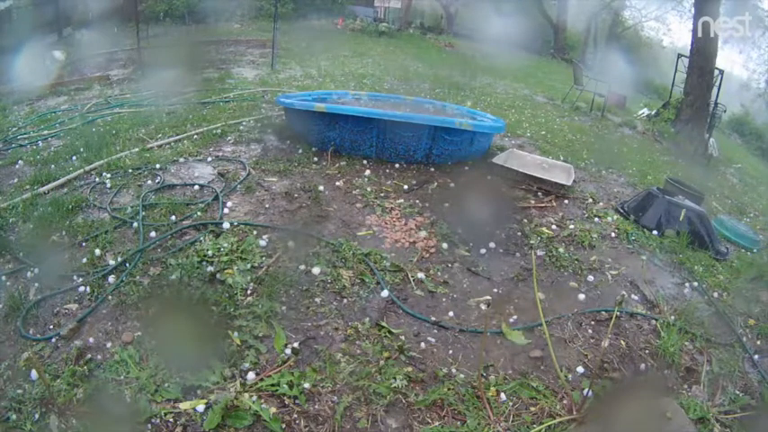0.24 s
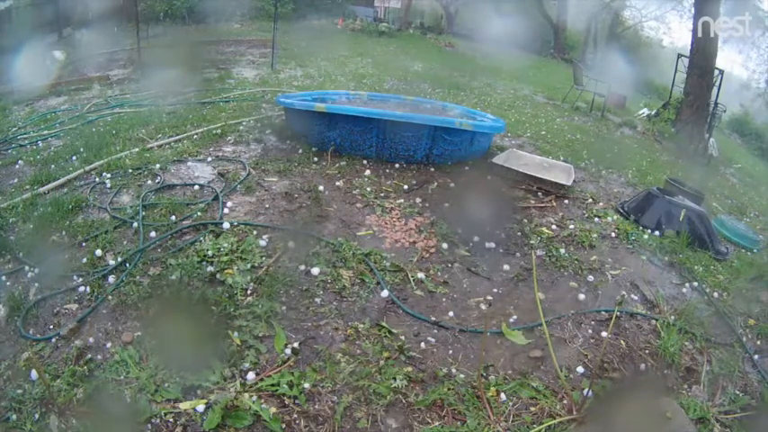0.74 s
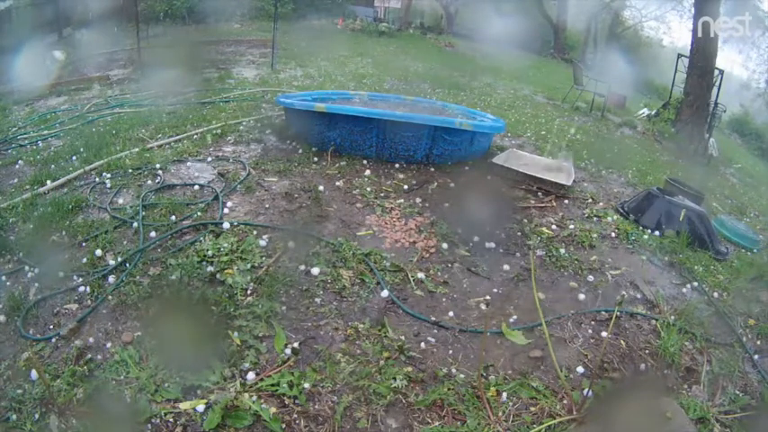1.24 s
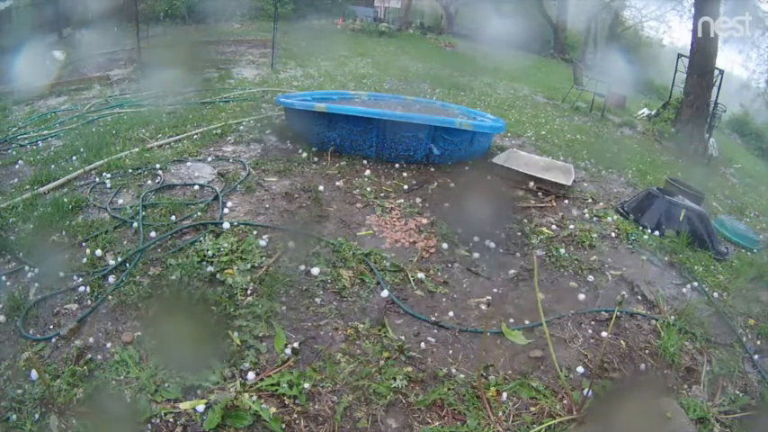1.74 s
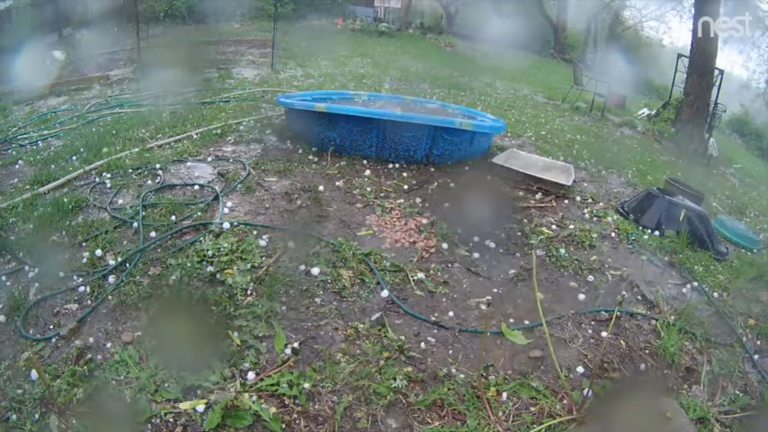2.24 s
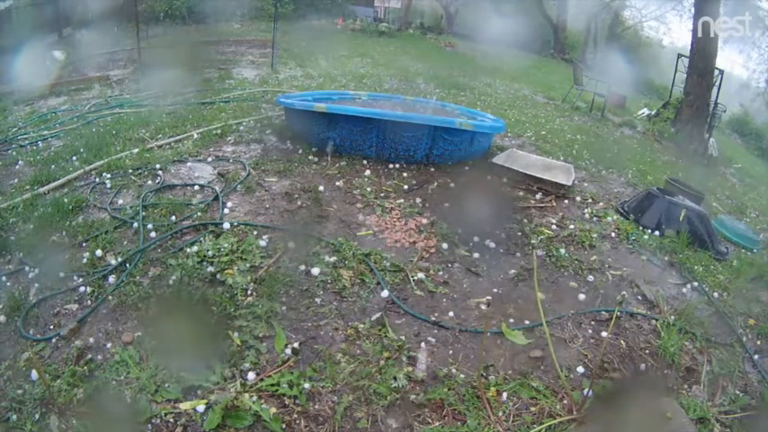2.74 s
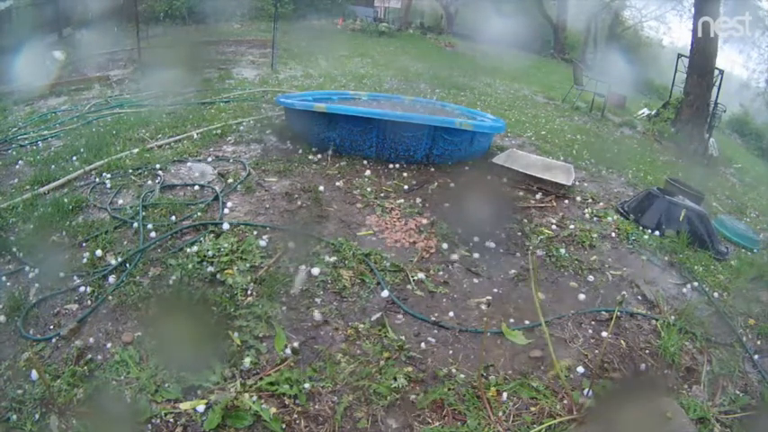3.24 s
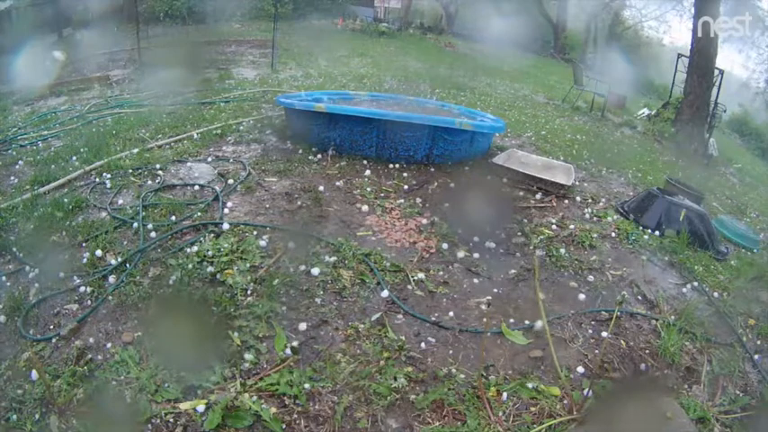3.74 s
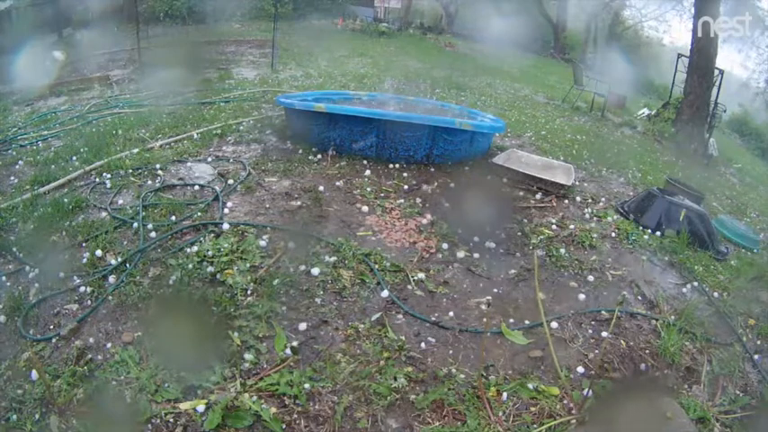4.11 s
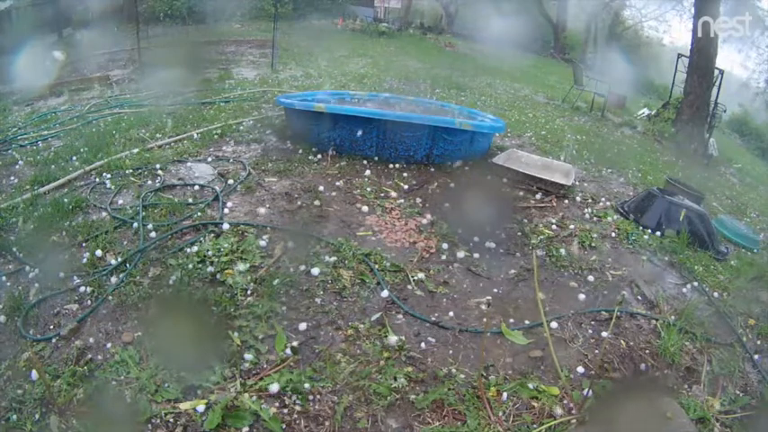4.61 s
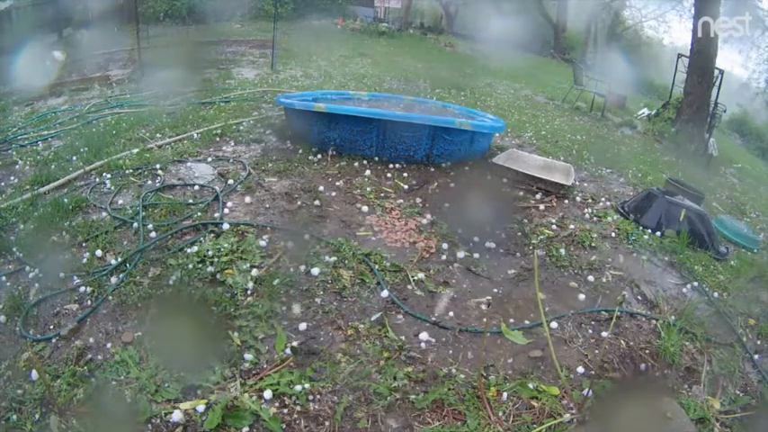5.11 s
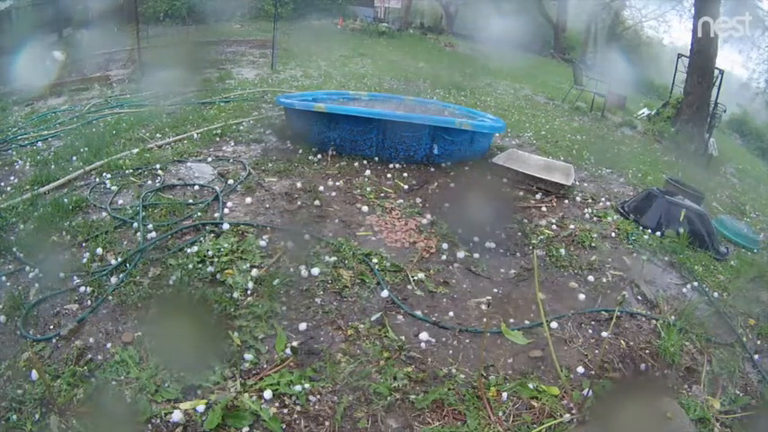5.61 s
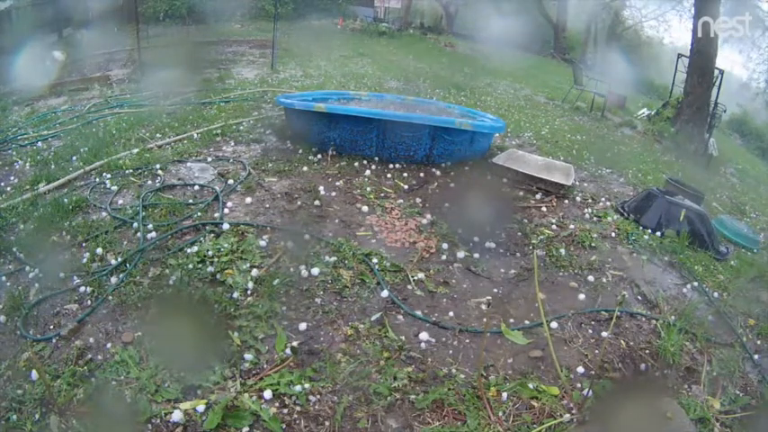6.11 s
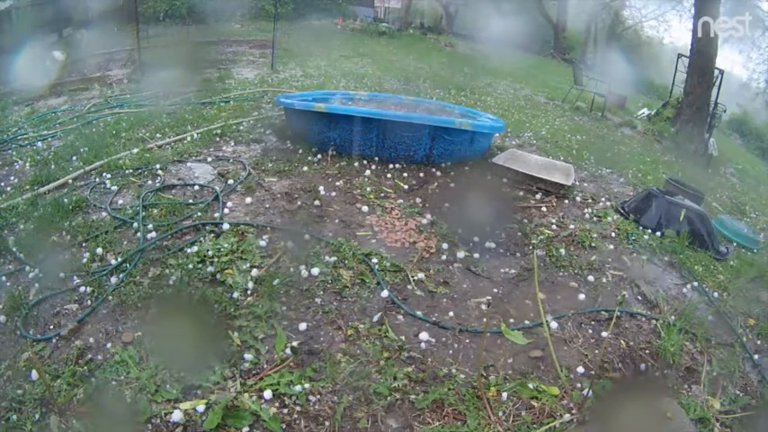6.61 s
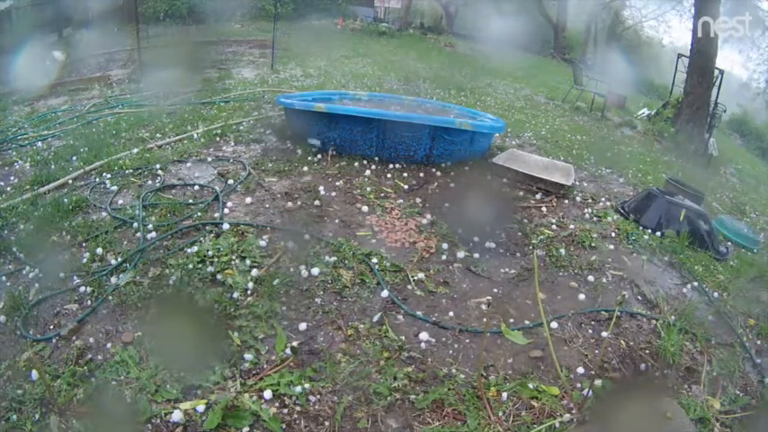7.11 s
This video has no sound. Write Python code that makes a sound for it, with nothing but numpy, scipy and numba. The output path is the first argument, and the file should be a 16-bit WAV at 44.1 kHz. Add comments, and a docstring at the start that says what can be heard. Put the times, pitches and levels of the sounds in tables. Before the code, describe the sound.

A dense patter of hail and rain fills a back yard from start to end, swelling and dipping slightly. Over it, single stones crack and shatter close to the microphone, while others knock hollowly on a plastic wading pool, boards and soil. Hard ticks are scattered throughout. Impacts crowd together around the middle. A small outdoor camera picks it up, thin in bass and dull at the very top.

```python
"""A patter of hail and rain runs throughout, swelling and dipping, in a back yard heard by a small outdoor camera.
Noise and thousands of small impacts in third-octave bands make it, with many short faint tones at random pitches.
Over it, stones crack and shatter close to the microphone: short ringing, noisy bursts.
Others knock on a plastic pool, boards and soil: damped rings, thuds and a rattling pool wall.
Ticks of hard contact and a low thump of the camera mount complete the yard; bass and top are cut steeply."""
import sys
import numpy as np
from scipy import signal
from scipy.io import wavfile
from scipy.ndimage import uniform_filter1d
from numba import njit

SR = 44100
rng = np.random.default_rng(int(sys.argv[2]) if len(sys.argv) > 2 else 0)


def inscribe(sig):
    """Save sig as 16-bit PCM at rate SR to the path in sys.argv[1].

    A 1-D sig is mono; a 2-D sig holds one channel per row.
    Samples are clipped to [-1, 1] before scaling.
    """
    pcm = np.round(np.clip(np.atleast_2d(sig).T, -1, 1) * 32767)
    wavfile.write(sys.argv[1], SR, pcm.astype(np.int16))


N = 324576  # length in samples

# patter over time, swelling with the shower: start_s, level_db, low_db (boost of its low bands)
PATTER_LEVELS = [(0.0, -36.5, 3), (2.659, -36.5, 3), (2.77, -32, 0), (2.97, -37.5, 0.5), (3.16, -36, 3),
                 (3.521, -35, 3.5), (4.14, -36, 0), (4.32, -34, 4.5), (4.67, -34.5, 0), (4.819, -36, 2.5),
                 (6.35, -34, 1.5), (6.77, -38, 6), (6.93, -35, 3), (7.09, -34.5, 1), (7.36, -38.5, 4.5)]
# spectrum of the patter: pitch_hz, level_db (per Hz)
PATTER_COLOUR = [(88, -63), (150, -39), (226, -14), (493, -4), (1420, 1.5), (3380, -2.5), (3850, 1),
                 (4460, 0.5), (4920, -2), (6490, -10), (6930, -17), (7400, -52), (9620, -82), (16300, -120)]
# moments when the patter drops away after some loud stones: start_s, depth_db, length_s
PATTER_DIPS = [(2.314, -11, 0.012), (2.783, -9.5, 0.1), (3.734, -5.5, 0.021), (4.475, -6.5, 0.0064),
               (5.66, -3, 0.013), (6.416, -2, 0.03), (6.767, -5, 0.064)]
# stones that shatter near the microphone: start_s, level_db, low_ring_hz, high_ring_hz, length_ms
CRACKS = [(0.11, -23, 3440, 5130, 14), (0.385, -29, 3500, 4230, 19), (0.659, -17.5, 3500, 3750, 7),
          (0.675, -16, 3280, 3800, 7.2), (0.685, -17.5, 3800, 4100, 9.7), (0.928, -21, 3630, 4700, 10),
          (0.9412, -15.5, 2400, 4560, 3.5), (1.319, -21, 3730, 4100, 14), (1.991, -18, 3110, 4780, 26),
          (2.1847, -26.5, 3500, 5530, 46), (2.3096, -17, 4300, 4220, 9.8), (2.311, -20.5, 3530, 5370, 7.5),
          (2.3216, -15.5, 2530, 4500, 2.4), (2.753, -22, 2760, 3740, 9.5), (2.772, -25, 3700, 4450, 18),
          (2.7749, -8.5, 4300, 4480, 3.3), (2.784, -11, 2726, 4450, 3.4), (3.089, -22, 3330, 4200, 15),
          (3.541, -25.5, 3180, 4580, 25), (3.717, -16.5, 3180, 4400, 9.5), (3.75, -25, 3470, 4400, 36),
          (3.92, -19, 3900, 3760, 17), (3.946, -12.5, 2080, 4100, 8), (3.961, -21.5, 3000, 4140, 11),
          (4.111, -14.5, 2410, 5380, 15), (4.114, -20, 3200, 4120, 8.1), (4.117, -30, 1800, 6560, 10),
          (4.133, -21.5, 2020, 4080, 18), (4.3065, -21, 2290, 4320, 29), (4.419, -21.5, 2830, 4460, 13),
          (4.469, -16, 3340, 4150, 14.6), (4.518, -25.5, 3350, 3850, 46), (4.6072, -17.5, 2420, 4640, 26),
          (4.812, -11.5, 2600, 4530, 1.6), (4.819, -15, 2360, 4530, 5.1), (5.027, -23.5, 2700, 4300, 47),
          (5.427, -18, 3510, 3800, 17), (5.626, -18, 4200, 4600, 4), (5.6335, -15, 3200, 4490, 6.6),
          (5.648, -18.5, 2800, 3300, 15), (5.7887, -13, 2760, 4390, 13), (5.801, -18, 3400, 4700, 18),
          (6.132, -26, 1835, 2600, 6.5), (6.2332, -23.5, 3860, 4270, 23), (6.353, -17.5, 3750, 4400, 8.9),
          (6.386, -18.5, 2360, 4080, 15), (6.416, -17.5, 2850, 4500, 8.7), (6.733, -19.5, 3050, 5560, 13),
          (6.7486, -15.5, 3200, 4690, 13), (6.995, -20.5, 3590, 3880, 6), (7.259, -26, 3760, 4300, 24),
          (7.2858, -15.5, 3040, 4690, 18), (7.3296, -26, 3350, 4100, 18)]
# stones on hollow or soft things: start_s, level_db, pitch_hz, thud_db and pool_db (both against level_db), hold_ms
KNOCKS = [(0.113, -29, 1520, -34, -23, 1.8), (0.493, -22, 1060, -6, -9.5, 1.3),
          (0.658, -31, 1027, -7.5, -3.5, 2), (0.742, -33, 560, -10, -7, 2.2),
          (0.85, -28.5, 1890, -22, -11, 2), (1.059, -26, 1560, -35, -5.5, 5.4),
          (1.0672, -19.5, 910, -40, -8.5, 9.1), (1.108, -35, 1235, -38, -10, 4),
          (1.126, -30, 1180, -35, -6, 3.5), (1.314, -35.5, 1616, -2, -2.5, 2),
          (1.476, -28.5, 1263, -24, -8, 2), (1.866, -22.5, 1017, -37, -10, 3.2),
          (1.874, -20.5, 972, -39, -8.5, 4.5), (1.996, -31.5, 1820, -31, -4, 2),
          (2.306, -22.5, 1113, -22, -13.5, 5), (2.3121, -18, 1227, -28, -19, 2.8),
          (2.317, -22.5, 1280, -18.5, -17, 3.1), (2.524, -31, 1494, -13, -10, 2),
          (2.7546, -25, 904, -21, -10, 2), (2.768, -23, 1415, -31, -15, 10.6),
          (2.7819, -14, 1360, -20, -28, 3.5), (2.93, -26, 1723, -20, -32, 2.7),
          (3.095, -27, 1237, -19, -15, 1.6), (3.541, -31, 1510, -12.5, -4, 2),
          (3.7208, -19, 1730, -25, -16.5, 1.9), (3.873, -29.5, 1670, -42, -22, 2),
          (3.95, -18.5, 1370, -29, -18, 1.7), (4.111, -24.5, 1210, -36, -1, 3),
          (4.241, -31.5, 1097, -18, -2, 1.7), (4.3067, -23, 1320, -18.5, -13, 5.3),
          (4.43, -23, 1380, -34, -8.5, 3.6), (4.471, -25.5, 1620, -16, -12, 1.8),
          (4.529, -24, 1110, -22, -7.5, 1.8), (4.56, -31, 1130, -26, 1.5, 1.8),
          (4.597, -25.5, 840, -18, -1, 1.8), (4.616, -19, 973, -37, -7.5, 3.8),
          (4.664, -22, 1190, -27, -7.5, 3.4), (4.6761, -13, 1310, -37, -21, 3.7),
          (4.718, -32, 1204, -30, -19, 4), (4.747, -43, 1397, -28, -17, 4),
          (4.818, -21.5, 900, -10, -10.5, 3), (4.856, -21, 1440, -32, -26, 5),
          (4.909, -33.5, 887, -11, 0, 1.9), (5.028, -23.5, 910, -42, -3, 8.2),
          (5.056, -30, 1047, -41, -7, 2), (5.072, -30, 1215, -36, -6, 2), (5.104, -36, 970, -27, -4, 2),
          (5.278, -30, 1590, -17, -1, 1.8), (5.33, -21, 1110, -27, -26, 2.2),
          (5.419, -24.5, 996, -16.5, -18, 1.7), (5.648, -30, 1095, -9, -11, 1.7),
          (5.788, -21.5, 1400, -36, -7, 4.5), (5.798, -17.5, 950, -26, -8, 3.4),
          (5.808, -20.5, 910, -36, -13, 4.6), (6.1331, -21.5, 1120, -18, -8.5, 2.3),
          (6.355, -34.5, 1412, -12, -2, 2), (6.388, -24.5, 1120, -24, -13.5, 3.3),
          (7.265, -30, 2000, -30, -16, 2)]
# modes of the plastic pool wall, around which each blow varies: pitch_hz, level_db, t60_s
POOL_MODES = [(898, -17, 0.15), (951, -9.5, 0.22), (1051, -9, 0.26), (1173, -12, 0.39), (1279, -10, 0.48),
              (1419, -11.5, 0.38), (1703, -8.5, 0.2), (2310, -24.5, 0.069)]
# dry instant of contact of a hard stone: start_s, level_db, pitch_hz
TICKS = [(0.2445, -26.0, 3260.0), (0.3992, -26.0, 3850.0), (0.494, -14.5, 1620.0), (0.6598, -20.0, 3200.0),
         (0.7423, -24.0, 2970.0), (0.7757, -22.0, 2750.0), (0.8479, -23.0, 2810.0), (0.9335, -25.0, 4370.0),
         (0.9427, -17.0, 4110.0), (1.3187, -19.0, 3490.0), (1.3796, -22.0, 3420.0), (1.4492, -25.0, 3210.0),
         (1.4801, -24.0, 2880.0), (1.8776, -20.0, 1590.0), (2.0029, -19.0, 3000.0), (2.1871, -24.0, 4170.0),
         (2.3123, -13.0, 1710.0), (2.3242, -20.0, 3400.0), (2.5265, -23.0, 2220.0), (2.7562, -20.0, 2150.0),
         (2.7759, -15.0, 3770.0), (2.7828, -18.0, 2200.0), (3.3468, -20.0, 3050.0), (3.5726, -20.0, 2760.0),
         (3.7215, -15.0, 2060.0), (3.8129, -24.0, 3050.0), (3.8769, -24.0, 2260.0), (3.9341, -22.0, 3360.0),
         (3.9508, -14.0, 3730.0), (3.9716, -24.0, 3010.0), (4.1109, -21.0, 2400.0), (4.1184, -17.0, 2420.0),
         (4.2418, -21.0, 2780.0), (4.3071, -14.0, 2400.0), (4.3233, -19.0, 2850.0), (4.4173, -20.0, 3300.0),
         (4.4338, -20.0, 1890.0), (4.4413, -23.0, 2800.0), (4.4761, -18.0, 3240.0), (4.5525, -22.0, 3230.0),
         (4.6027, -18.0, 2100.0), (4.6111, -15.0, 2280.0), (4.6766, -20.0, 2600.0), (4.8126, -18.0, 2430.0),
         (4.819, -18.0, 3300.0), (4.8251, -21.0, 2090.0), (4.8594, -22.0, 2330.0), (5.0302, -17.0, 1400.0),
         (5.0828, -21.0, 2690.0), (5.2501, -24.0, 3840.0), (5.3315, -19.0, 1410.0), (5.4341, -16.0, 3240.0),
         (5.5141, -24.0, 3270.0), (5.6348, -19.0, 4030.0), (5.7944, -16.0, 2790.0), (5.8053, -21.0, 3100.0),
         (5.9283, -22.0, 3660.0), (6.0574, -22.0, 2250.0), (6.1344, -21.0, 1840.0), (6.2312, -23.0, 3900.0),
         (6.2821, -21.0, 3160.0), (6.3513, -22.0, 3680.0), (6.3566, -17.0, 3470.0), (6.3906, -21.0, 2740.0),
         (6.4237, -21.0, 3850.0), (6.4762, -23.0, 3210.0), (6.5345, -24.0, 3010.0), (6.7509, -18.0, 3600.0),
         (6.7628, -23.0, 3940.0), (7.0004, -24.0, 3610.0), (7.0849, -23.0, 3500.0), (7.1645, -22.0, 3640.0),
         (7.2917, -17.0, 4400.0), (7.3033, -23.0, 4680.0)]
# a heavy stone shakes the camera mount: start_s, level_db, pitch_hz, t60_s
MOUNT_THUMPS = [(4.816, -29, 210, 0.11), (4.81, -22, 52, 0.12)]

# Smaller stones landing by chance: one row (mean, spread) for each column after start_s of the table above.
# rows: level_db, low_ring_hz, high_ring_hz, length_ms
SMALL_CRACKS = [(-30, 2), (2999, 500), (4303.5, 310), (9, 2.2)]
# rows: level_db, pitch_hz, thud_db, pool_db, hold_ms
SMALL_KNOCKS = [(-34, 2.2), (1394.5, 140), (-23.5, 6.7), (-13, 4.6), (0.5, .8)]
# rows: level_db, pitch_hz
SMALL_TICKS = [(-31.5, 1.5), (3197, 280)]
# how often small stones land: knocks_per_s, cracks_per_s, ticks_per_s
SMALL_RATES = (1.5, 1.5, 3)

HIGH_RING_DB = 4.5  # high ring of a crack against its low one
CLEAR_RING = 1  # clear tone in the rings of a crack, against their rough part
SPLINTERS_PER_MS = 0.048  # extra broad spatter of a crack against its rings, per ms of its length
KNOCK_T60_S, SHORTER_PER_DB = 0.047, 0.1848  # ring of a -26 dB, 1300 Hz knock; louder ones die faster
LOW_RINGS_LONGER = 0.99  # a knock rings as (1300 Hz / pitch) to this power
OVERTONE, OVERTONE_DB = 1.5, -13  # rough second ring of a knock: multiple of its pitch, level
WALL_RISE_S = 0.019  # the pool wall takes up a blow more slowly than the struck spot
TOP_HZ, SHELF_HZ, BOTTOM_HZ = 7450, 6850, 180  # microphone response: top cut, shelf, bass cut
SHELF_DB, BASS_LEAK_DB = -14.5, -36.5  # what is left above the shelf and of the deep bass


def undb(db):
    """Gain of a level in dB."""
    return 10 ** (np.asarray(db) / 20)


def unit(x):
    """Scaled to rms 1."""
    return x / np.sqrt(np.mean(x ** 2))


def band(x, hz, width_hz):
    """Resonant band-pass, gain 1 at the centre."""
    return signal.lfilter(*signal.iirpeak(min(hz, .4 * SR), hz / width_hz, fs=SR), x)


def fade(t, t60):
    """Exponential decay by 60 dB in t60 seconds (3 ms at least)."""
    return np.exp(-np.log(1000) * t / max(t60, .003))


def add(out, s, sound):
    """Mixes a sound in at time s."""
    i = max(int(s * SR), 0)
    out[i:i + len(sound)] += sound[:N - i]


def scatter(per_s, columns):
    """Rows of events at random moments, each column drawn around its mean."""
    mean, spread = np.transpose(columns)
    count = int(per_s * N / SR)
    start_s = rng.random(count) * N / SR
    values = mean + spread * rng.standard_normal((count, len(mean)))
    return list(np.column_stack([start_s, values]))


def walk(rate):
    """Random levels held 1 / rate s and smoothed twice over that time; spread 1."""
    hold = int(SR / rate)
    steps = np.repeat(rng.standard_normal(N // hold + 1), hold)
    smooth = uniform_filter1d(uniform_filter1d(steps, hold), hold)[:N]
    return smooth / smooth.std()


def drops(rate, spread_db):
    """Single-sample impacts at random moments; many are small, a few large."""
    when, size, sign = rng.random((int(rate * N / SR) + 1, 3)).T
    size_db = spread_db * np.minimum(-np.log(size + 1e-9), 3.8)
    out = np.zeros(N)
    out[(when * N).astype(int)] = np.sign(sign - .5) * undb(size_db)
    return unit(out)


@njit
def decaying_tones(count, start, hz, size, t60):
    """Decaying sines, each made by a turning and shrinking complex number."""
    out = np.zeros(count)
    for k in range(len(start)):
        z = size[k] + 0j
        turn = np.exp((2j * np.pi * hz[k] - np.log(1000) / t60) / SR)
        for i in range(start[k], min(count, start[k] + int(t60 * SR))):
            z *= turn
            out[i] += z.imag
    return out


def short_tones(hz):
    """Many short decaying tones at random pitches around hz, which roughen the patter."""
    when, pitch, size = rng.random((int(.03 * hz * N / SR), 3)).T
    start = (when * N).astype(int)
    tone_hz = hz * (.89 + .23 * pitch)
    return unit(decaying_tones(N, start, tone_hz, undb(-2.5 * np.log(size + 1e-2)), .24))


def patter():
    """Third-octave bands of far hiss and nearer drops, each flickering by itself, roughened by short tones."""
    t = np.arange(N) / SR
    start_s, level_db, low_db = np.transpose(PATTER_LEVELS)
    level_db, low_db = (np.interp(t, start_s, column) for column in (level_db, low_db))
    for start, depth_db, length in PATTER_DIPS:
        corners = start + np.array([-.004, 0, length, length + 0.085])
        level_db = level_db + depth_db * np.interp(t, corners, [0, 1, 1, 0])
    colour_hz, colour_db = np.transpose(PATTER_COLOUR)
    near = drops(170, spread_db=6.0)  # shared by all bands
    out = 0
    for hz in 190 * 2 ** np.arange(0, 5.3, 1 / 3):
        far_hiss = rng.standard_normal(N)
        grain = far_hiss + undb(-5.0) * near + undb(-2.5) * drops(400, spread_db=3.0)
        sound = band(band(grain, hz, hz / 3), hz, hz / 3)
        tone_share = undb(5) * min(hz / 2500, 1) ** 2  # weaker in the low bands
        sound = sound + tone_share * sound.std() * short_tones(hz)
        lowness = 1 / (1 + (hz / 1700) ** 4)
        flicker_db = 1.1 * walk(22)
        band_db = np.interp(np.log(hz), np.log(colour_hz), colour_db) + lowness * low_db + flicker_db
        out = out + undb(band_db) * sound
    return unit(out) * undb(level_db)


def cracks():
    """Short ringing, noisy bursts: a spatter of ice splinters with two rough rings."""
    out, t = np.zeros(N), np.arange(SR // 8) / SR
    lead_s = .014  # fade-in time before the listed moment
    after_ms = 1000 * np.maximum(t - lead_s, 0)

    def ring(noise, hz, width_hz):
        """A clear tone with narrow noise around it."""
        rough = unit(band(band(noise, hz, width_hz), hz, width_hz))
        return CLEAR_RING * np.sin(2 * np.pi * hz * t) + rough

    for s, db, low_hz, high_hz, length_ms in CRACKS + scatter(SMALL_RATES[1], SMALL_CRACKS):
        noise = rng.standard_normal((3, len(t)))
        rings = ring(noise[0], low_hz, 450) + undb(HIGH_RING_DB) * ring(noise[1], high_hz, 300)
        splinters = (0.36 + SPLINTERS_PER_MS * length_ms) * unit(band(noise[2], 3900, 3200))
        spatter = unit(rings) + splinters
        fade_in = np.clip(t / lead_s, 0, 1) ** 2.2
        fade_out = 1 / (1 + (after_ms / max(length_ms, 1.5)) ** 8)
        add(out, s - lead_s, undb(db) * fade_in * fade_out * spatter / np.abs(spatter).max())
    return out


def pool_wall(noise, t):
    """The stone bounces and the wall rattles on, so every mode is fed unevenly and sits slightly off pitch."""
    wall = 0
    chance = rng.standard_normal((len(POOL_MODES), 2))
    for (hz, db, t60), (level, detune) in zip(POOL_MODES, chance):
        mode = unit(band(noise, hz * (1 + 0.013 * detune), 37))
        wall = wall + undb(db + 2 * level) * mode * fade(t, t60)
    return (1 - fade(t, WALL_RISE_S)) * wall


def knocks():
    """A rough damped ring at the pitch of the struck thing, a thud, and the rattling ring of the pool wall."""
    out, t = np.zeros(N), np.arange(SR // 3) / SR
    for s, db, hz, thud_db, pool_db, hold_ms in KNOCKS + scatter(SMALL_RATES[0], SMALL_KNOCKS):
        # a harder blow is drier, a lower pitch rings longer
        t60 = KNOCK_T60_S * np.exp(-SHORTER_PER_DB * (db + 26))
        t60 = t60 * (1300 / np.clip(hz, 850, 1600)) ** LOW_RINGS_LONGER
        noise = rng.standard_normal((3, len(t)))
        ring = np.sin(2 * np.pi * hz * t) + 0.4 * unit(band(noise[0], hz, 0.2 * hz))
        ring = ring + undb(OVERTONE_DB) * unit(band(noise[1], OVERTONE * hz, 0.39 * hz))
        ring = 0.69 * ring * fade(np.maximum(t - hold_ms / 1000, 0), t60)
        thud = unit(band(band(noise[1], 500, 720), 500, 720)) * fade(t, 0.17)
        blow = ring + undb(thud_db) * thud + undb(pool_db) * pool_wall(noise[2], t)
        onset = 1 - fade(t, .006)
        add(out, s - .001, undb(db) * onset * blow)
    return out


def ticks():
    """Hard contact: one or two cycles each in a bell-shaped envelope, centred on the moment of contact."""
    out, t = np.zeros(N), np.arange(-100, 100) / SR
    for s, db, hz in TICKS + scatter(SMALL_RATES[2], SMALL_TICKS):
        envelope = np.exp(-(t * hz / .8) ** 2)
        add(out, s + t[0], undb(db) * np.sin(2 * np.pi * hz * t) * envelope)
    return out


def mount_thumps():
    """The shaken camera mount: low sines that rise softly and die away."""
    out, t = np.zeros(N), np.arange(SR // 3) / SR
    for s, db, hz, t60 in MOUNT_THUMPS:
        add(out, s, undb(db) * np.sin(2 * np.pi * hz * t) * (1 - fade(t, 0.016)) * fade(t, t60))
    return out


def scene():
    """Everything in the yard reaches one microphone."""
    return (patter() + cracks() + knocks() + ticks() + mount_thumps())[None]


def steep_low_pass(x, hz):
    """Elliptic low-pass, nearly a wall."""
    return signal.sosfilt(signal.ellip(11, .3, 75, hz, fs=SR, output="sos"), x)


def high_pass(x, hz):
    """Butterworth high-pass of order 8."""
    return signal.sosfilt(signal.butter(8, hz, "high", fs=SR, output="sos"), x)


def record(dry):
    """The camera turns down the bass and the top steeply over a faint hiss of its own."""
    deep_bass = signal.sosfilt(signal.butter(4, 100, fs=SR, output="sos"), dry)
    x = high_pass(dry, BOTTOM_HZ) + undb(BASS_LEAK_DB) * deep_bass
    x = steep_low_pass(x, SHELF_HZ) + undb(SHELF_DB) * high_pass(x, SHELF_HZ)
    # hiss enters both before and after the top cut
    x = steep_low_pass(x + undb(-101) * rng.standard_normal(x.shape), TOP_HZ)
    return x + undb(-101) * rng.standard_normal(x.shape)


dry = scene()
out = record(dry)
inscribe(out)
```